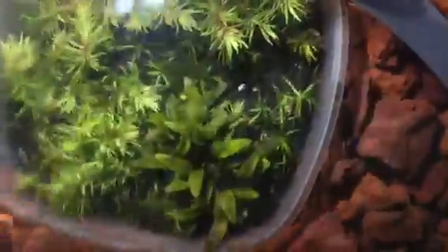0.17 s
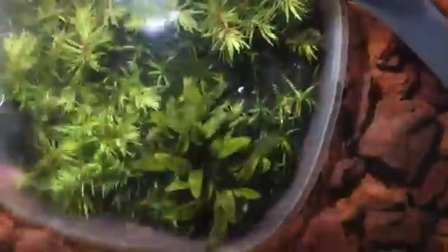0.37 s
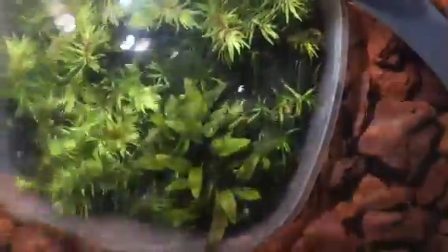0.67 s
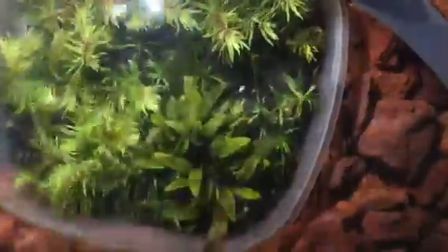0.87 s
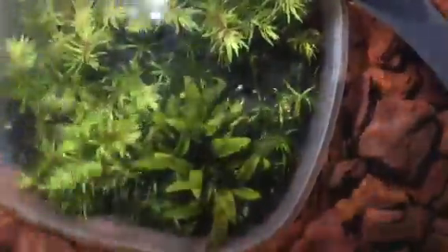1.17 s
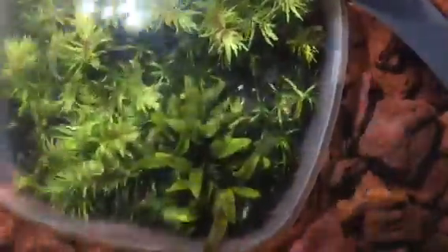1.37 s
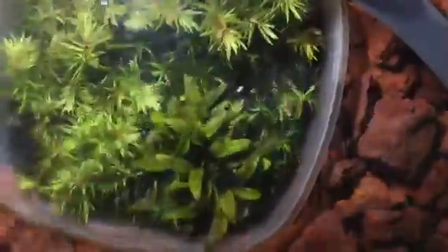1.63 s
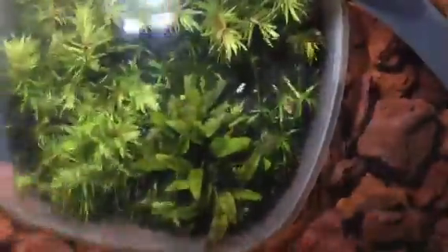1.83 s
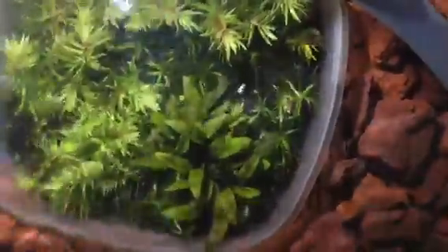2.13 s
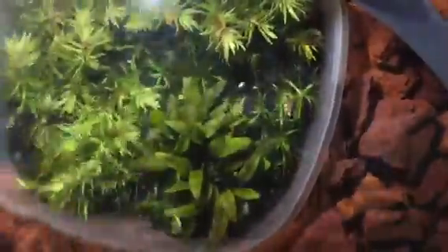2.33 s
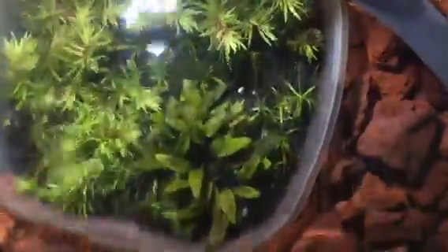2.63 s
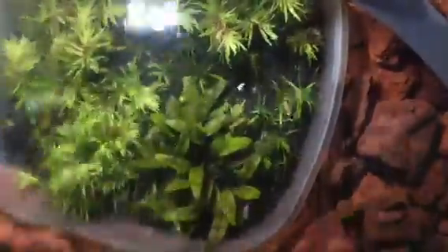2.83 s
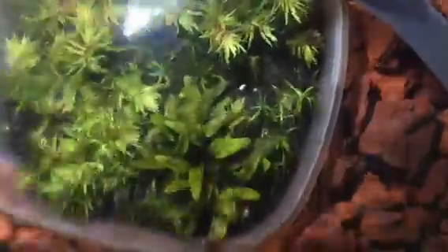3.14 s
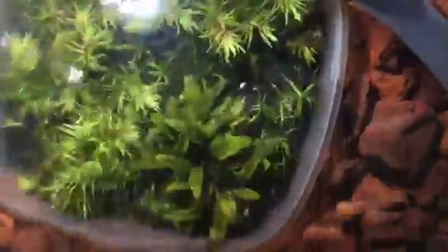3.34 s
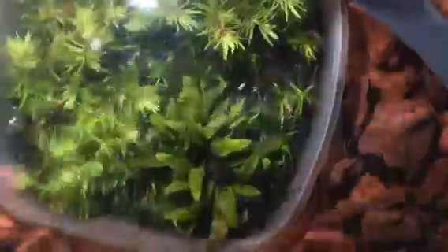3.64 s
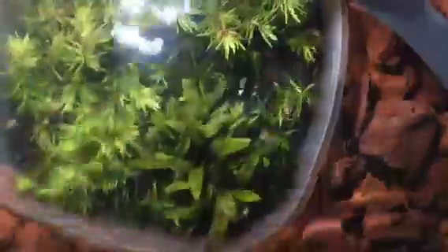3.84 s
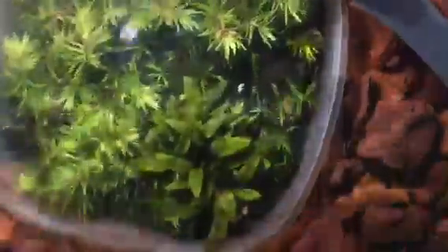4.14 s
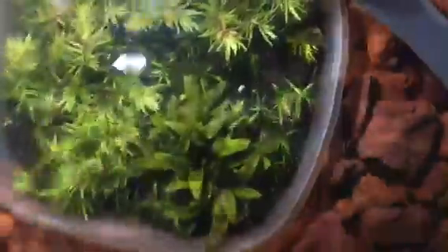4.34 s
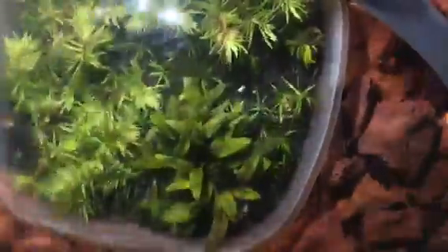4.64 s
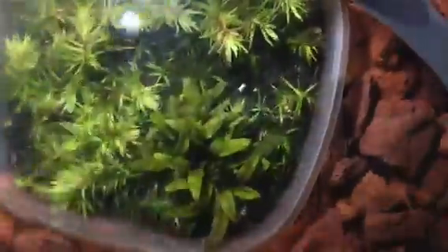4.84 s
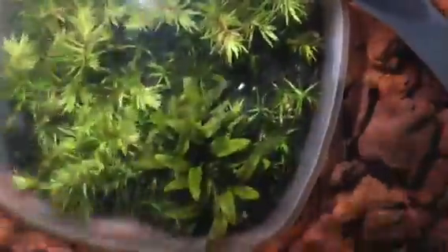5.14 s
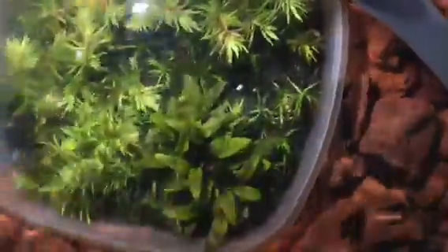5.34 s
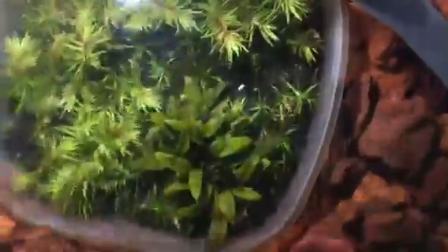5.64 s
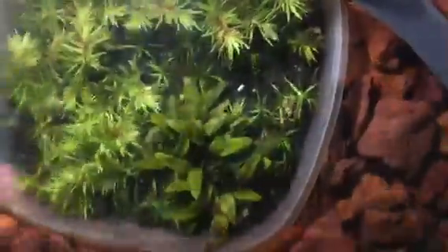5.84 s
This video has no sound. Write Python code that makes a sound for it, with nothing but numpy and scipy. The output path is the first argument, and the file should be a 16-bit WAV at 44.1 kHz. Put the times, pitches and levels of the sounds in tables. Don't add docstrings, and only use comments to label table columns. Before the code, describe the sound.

Close by, an aquarium pump drones on a steady low mains hum, strongest near 120 Hz, over soft water rush, swelling low rumble and faint fizzing bubbles. Small plastic creaks tick quickly at first, then sparsely. A bright drop comes near 1.9 seconds, the hum thins slightly from about 2.1 to 4.5, and a louder plop rings at 3.9. Mono, small hand-held microphone, indoors.

```python
import sys
import numpy as np
from scipy import signal
from scipy.fft import rfft, irfft
from scipy.io import wavfile

SR = 44100
rng = np.random.default_rng(int(sys.argv[2]) if len(sys.argv) > 2 else 0)


def persist_wave(psi):
    counts = np.round(np.clip(psi, -1, 1) * 32767).astype(np.int16)
    wavfile.write(sys.argv[1], SR, np.atleast_2d(counts).T)


def field_ratio(decibels):
    return 10 ** (np.asarray(decibels, dtype=float) / 20)


N = 264600
MAINS_HZ = 59.9757


def rms_one(x):
    return x / np.sqrt(np.mean(x ** 2) + 1e-20)


def at_hz(points, hz):
    f_hz, level_db = np.transpose(points)
    return np.interp(np.log(hz), np.log(f_hz), level_db)


def drift(rate_hz):
    r = np.exp(-80 * np.pi * rate_hz / SR)
    coarse = rng.standard_normal(N // 40 + 2002)
    slow = signal.lfilter([1], [1, -2 * r, r * r], coarse)[2000:]
    return np.interp(np.arange(N) / 40, np.arange(len(slow)), rms_one(slow))


def ring(clicks, hz, t60_s):
    r = field_ratio(-60 / (t60_s * SR))
    w = 2 * np.pi * hz / SR
    return signal.lfilter([0, np.sin(w)], [1, -2 * r * np.cos(w), r * r], clicks + 1e-18)


def flurry(rows, tau_s):
    clicks = np.zeros(N)
    np.add.at(clicks, [round(s * SR) for s, db in rows], [field_ratio(db) for s, db in rows])
    return signal.lfilter([1], [1, -np.exp(-1 / (tau_s * SR))], clicks + 1e-18)


def second_path():
    from_s, until_s, change_s = 2.094, 4.546, .012
    t = np.arange(N) / SR
    return np.clip((t - from_s) / change_s, 0, 1) - np.clip((t - until_s) / change_s, 0, 1)


def hum(second):
    # multiple of mains [1], first path [dB rms], second path [dB rms]
    hum_lines = [(1, -42.5, -44.9), (2, -31.6, -33.8), (3, -50.3, -48.9), (4, -46.4, -49.1),
                 (5, -53.4, -54.5), (6, -48.1, -47.0), (7, -68.4, -69.3), (8, -72.0, -97.6),
                 (9, -66.6, -67.3), (10, -70.9, -69.8), (11, -90.8, -78.0), (12, -77.6, -77.6),
                 (13, -70.8, -66.9), (14, -71.7, -69.3), (15, -75.8, -71.4), (16, -76.0, -78.2),
                 (17, -67.5, -62.7), (18, -70.1, -71.6), (19, -58.9, -56.8), (20, -61.4, -60.1),
                 (21, -92.9, -78.5), (22, -76.3, -77.7), (23, -81.5, -76.4), (24, -68.6, -68.8)]
    # multiple of mains [1], level [dB rms]
    whine_lines = [(31, -76), (32, -85), (35, -86), (42, -87), (44, -86), (45, -82), (46, -85), (48, -81),
                   (49, -88), (50, -85), (57, -91), (64, -89), (84, -94), (149, -96), (154, -94),
                   (156, -93), (157, -95), (161, -91)]
    path_lag_turns = .22
    turn = 2 * np.pi * MAINS_HZ * np.arange(N) / SR
    out = np.zeros(N)
    load = drift(1.7)
    for k, first_db, second_db in hum_lines:
        phase = k * turn + 2 * np.pi * (.06 + .6 * k - .12 * k ** 2 - .01 * k ** 3)
        first = field_ratio(first_db) * np.cos(phase)
        late = field_ratio(second_db) * np.cos(phase - 2 * np.pi * path_lag_turns)
        waver_db = 0.44 * load + 0.081 * np.sqrt(k) * drift(6.7)
        out += (first + second * (late - first)) * field_ratio(waver_db)
    for k, level_db in whine_lines:
        whine = np.sin(round(k) * turn + rng.uniform(0, 2 * np.pi))
        out += field_ratio(level_db + 1.4 * drift(5.5)) * whine
    return np.sqrt(2) * out


def rumble():
    # full strength at [t/s], hold [s], level [dB]
    surges = [
        (0.0, .58, -47.5),
        (1.03, 0.33, -50),
        (2.1, .02, -43.5),
        (3.06, .02, -51),
        (3.95, 0.56, -47),
        (4.8, .08, -47),
        (5.29, .03, -48),
    ]
    rise_db_per_s, fall_db_per_s, lull_db, lapping_db = 80, 92, -58, 1
    air_hz, air_t60_s = 198.0, .06
    t = np.arange(N) / SR
    swells = []
    for s, hold_s, db in surges:
        before_s = np.maximum(s - t, 0)
        after_s = np.maximum(t - s - hold_s, 0)
        swells.append(db - rise_db_per_s * before_s - fall_db_per_s * after_s)
    once = ring(rng.standard_normal(N), air_hz, air_t60_s)
    level_db = np.maximum(np.max(swells, axis=0), lull_db + lapping_db * drift(7.1))
    return field_ratio(level_db - 2.5) * rms_one(ring(once, air_hz, air_t60_s))


def rush(second):
    # f [Hz], density [dB per Hz]
    spectrum = [(20, -82.5), (44, -79), (62, -72), (150, -80), (210, -79), (280, -74.5), (470, -89.5),
                (1400, -91), (1620, -94.5), (2900, -99), (5200, -107), (9600, -112.7), (10200, -117),
                (15600, -120)]
    # f [Hz], width [Hz], gain [dB]
    housing = [(284, 21, -5), (332, 20, -4), (478, 21, -1.5), (655, 16, 3.5), (732, 59, -3.5),
               (1040, 28, -1), (1576, 53, -8), (2443, 120, 5.5), (2870, 250, -2.5), (3360, 190, -6.5),
               (4470, 670, 1.5), (4870, 140, -6), (7760, 1100, -1.5), (10250, 350, -1.5)]
    # f [Hz], gain [dB]
    second_gain = [(60, -9.5), (150, 2), (500, -2.5), (900, 5), (1300, 1.5), (1600, -0.5), (4000, 0.5)]
    ripple_db, ripple_hz = 1.4, 40
    hz = np.maximum(np.arange(N // 2 + 1) * SR / N, 1)
    colour_db = at_hz(spectrum, hz)
    for top_hz, width_hz, db in housing:
        colour_db += db * np.exp(-2 * ((hz - top_hz) / width_hz) ** 2)
    colour_db += ripple_db * np.interp(hz / ripple_hz, np.arange(600), rng.standard_normal(600))
    noise = rfft(rng.standard_normal(N)) * field_ratio(colour_db) * np.sqrt(SR / 2)
    out = np.zeros(N)
    surge = drift(6.0)
    for centre_hz in 8 * 2 ** np.arange(0, 11.6, .5):
        share = np.maximum(1 - 2 * abs(np.log2(hz / centre_hz)), 0)
        gain_db = second * at_hz(second_gain, centre_hz) + 0.42 * surge + .6 * drift(11.0)
        out += irfft(noise * share, N) * field_ratio(gain_db)
    return out


def creaks():
    # t [s], peak [dB]
    creak_events = [(0.201, -58.5), (0.2318, -57.5), (0.2576, -54.5), (0.2891, -62), (0.4574, -55),
                    (0.4802, -59), (0.5236, -58), (0.5445, -53.5), (0.549, -58.5), (0.6887, -61),
                    (2.168, -65), (2.488, -60), (2.4974, -53), (2.9586, -59), (3.1012, -61), (3.2883, -63),
                    (3.3666, -62), (3.8068, -57), (4.337, -60), (4.3748, -55), (4.583, -58.5),
                    (4.8652, -60), (4.9664, -58), (5.219, -65), (5.501, -57), (5.5627, -55),
                    (5.7063, -59.5), (5.92, -59), (5.943, -60)]
    # f [Hz], level [dB], t60 [s]
    body_modes = [(6230, 0.5, 0.035), (6500, -1, 0.024), (6610, 3.5, 0.022)]
    # f [Hz], level [dB], t60 [s]
    upper_modes = [(5300, -5, .012), (7980, -5, .025), (9000, -5, .025), (9300, -6, .02),
                   (11200, -3.5, 0.0088), (12000, -8, .008), (13400, -9, .012)]
    rub_from_s, rub_every_s, rub_db = .129, .0235, -62.5
    slipping = rng.random(N) < 5000 / SR
    late, uneven = rng.standard_normal((14, 2)).T
    rub_s = rub_from_s + rub_every_s * (np.arange(14) + .15 * late)
    rub = np.transpose([rub_s, rub_db + 1.5 * uneven])
    s, peak_db = np.vstack([creak_events, rub]).T
    bright_db = -66.5 + 0.42 * (peak_db + 60)
    effort = slipping * flurry(list(zip(s, peak_db - 20.5)), 0.0098)
    sharp = slipping * flurry(list(zip(s, bright_db - 12.5)), .008)
    out = np.zeros(N)
    for strikes, modes in ((effort, body_modes), (sharp, upper_modes)):
        for hz, level_db, t60_s in modes:
            out += field_ratio(level_db) * ring(strikes * rng.standard_normal(N), hz, t60_s)
    return out + field_ratio(9.0) * np.diff(sharp * rng.standard_normal(N), prepend=0)


def drips():
    # t [s], peak [dB], ring f [Hz], crack [dB]
    drip_events = [
        (1.9036, -53.5, 8200, -62),
        (1.909, -60, 7400, -70),
        (2.361, -77, 15000, -69),
        (3.9263, -36.5, 2324, -57.5),
        (3.927, -56, 4580, -57),
        (3.933, -37, 2410, -68),
        (4.1027, -55.5, 15100, -59),
        (4.5825, -70, 8800, -59),
        (4.914, -70, 10600, -76.5),
        (5.73, -78, 12000, -70),
    ]
    white = rng.standard_normal((2, N))
    broad = rms_one(signal.lfilter([1], [1, -.55], white[1]))
    out = np.zeros(N)
    for s, peak_db, hz, crack_db in drip_events:
        t60_s = 49 / hz + .006
        splash_db = -62 + .45 * (peak_db + 59)
        click = 1. * (np.arange(N) == round(s * SR))
        splash = rms_one(ring(ring(white[0], hz, 11.0 / hz), hz, 11.0 / hz))
        out += field_ratio(peak_db) * ring(click, hz, t60_s)
        out += splash * flurry([(s, splash_db)], 0.0023)
        out += broad * flurry([(s, crack_db)], 0.0051)
    return out


def fizz(per_s, level_db):
    sizes = field_ratio(4.0 * np.minimum(rng.exponential(1, N), 4)) * rng.choice([-1, 1], N)
    born = rng.random(N) < per_s * field_ratio(3.5 * drift(4.5)) / SR
    dealt = rng.integers(0, 12, N)
    out = np.zeros(N)
    for k, hz in enumerate(np.geomspace(1800, 9000, 12)):
        out += ring(sizes * born * (dealt == k), hz, 14.0 / hz) * hz ** -.7
    return field_ratio(level_db) * rms_one(out)


def cavities():
    # f [Hz], width [Hz], level [dB rms]
    cavity_modes = [(6300, 420, -85.5), (9300, 330, -87.5)]
    out = np.zeros(N)
    for hz, width_hz, level_db in cavity_modes:
        once = ring(rng.standard_normal(N), hz, 2.2 / width_hz)
        out += field_ratio(level_db + 2.6 * drift(15.0)) * rms_one(ring(once, hz, 2.4 / width_hz))
    return out


def buzz():
    size, turn = rng.random((2, 200))
    bins = np.round(np.arange(50, 250) * MAINS_HZ * N / SR).astype(int)
    lines = np.zeros(N // 2 + 1, complex)
    lines[bins] = field_ratio(-112 + 12 * size ** 2) * np.exp(2j * np.pi * turn)
    return irfft(lines, N) * N / 2


def scene():
    second = second_path()
    pump = hum(second) + buzz()
    water = rush(second) + rumble() + cavities() + fizz(per_s=280, level_db=-79.5) + drips()
    return (pump + water + creaks())[None]


def band_limit(x):
    return signal.sosfilt(signal.butter(12, 15760, fs=SR, output="sos"), x)


def record(dry):
    steep = signal.cheby2(16, 40, 16020, fs=SR, output="sos")
    cut = signal.sosfilt(steep, dry)
    return band_limit(cut)


dry = scene()
out = record(dry)
persist_wave(out)
```